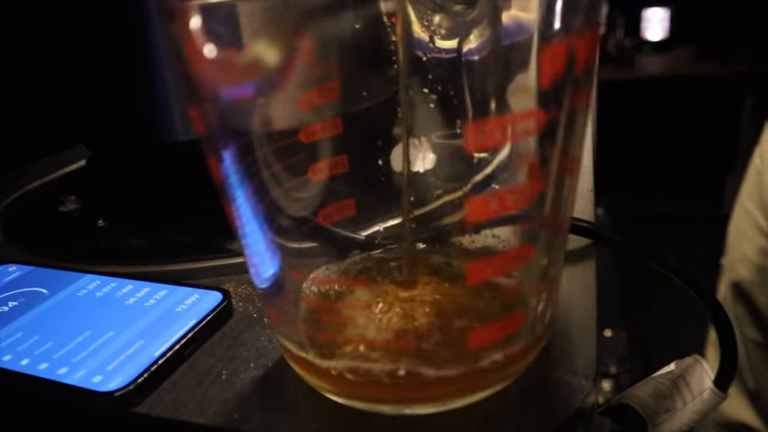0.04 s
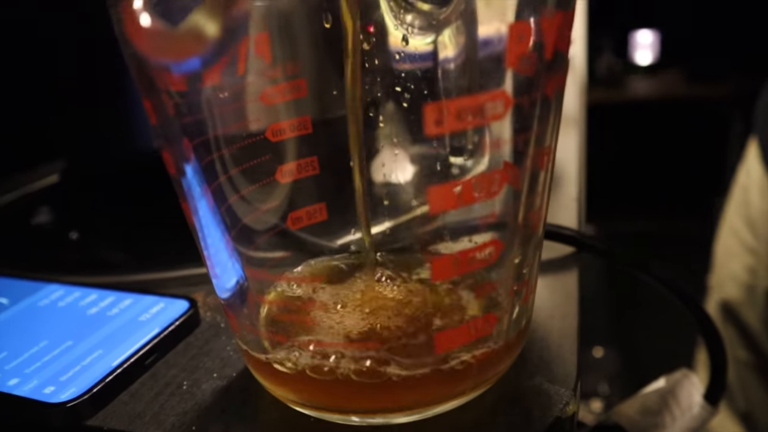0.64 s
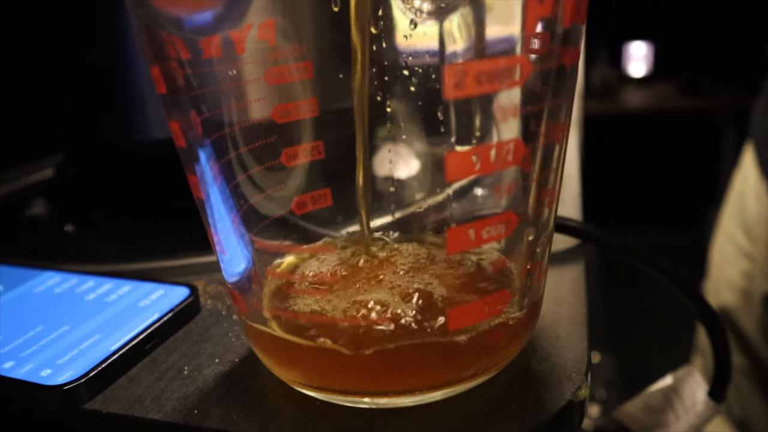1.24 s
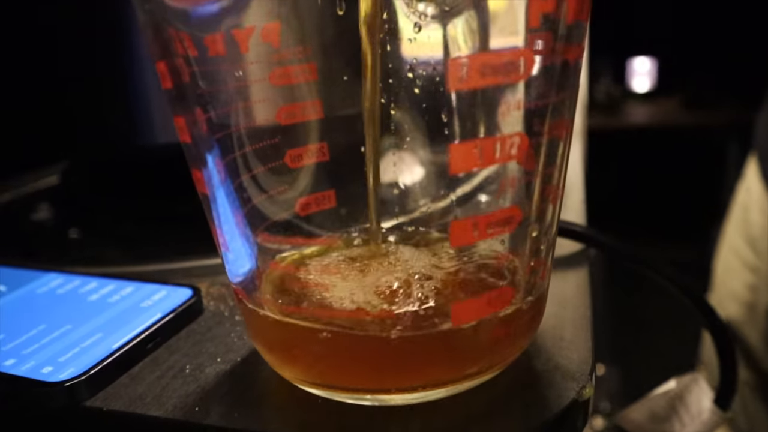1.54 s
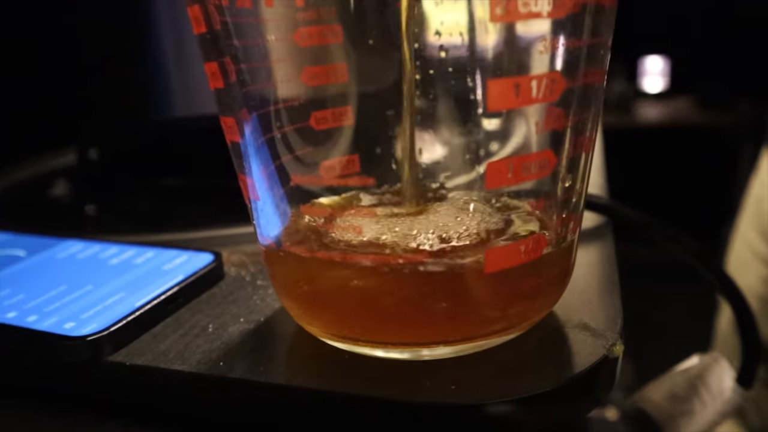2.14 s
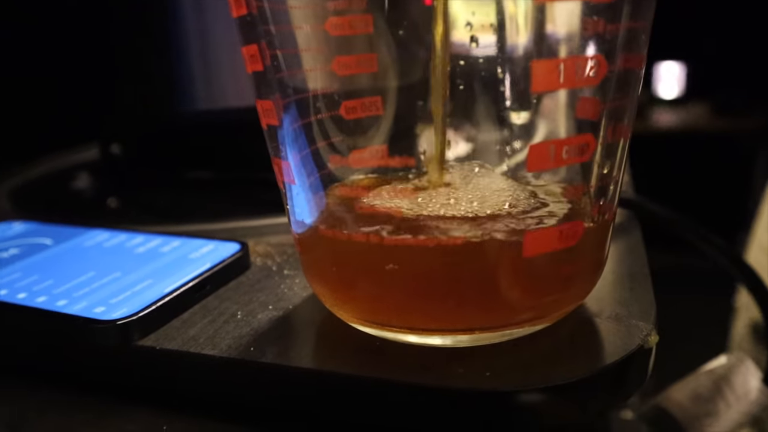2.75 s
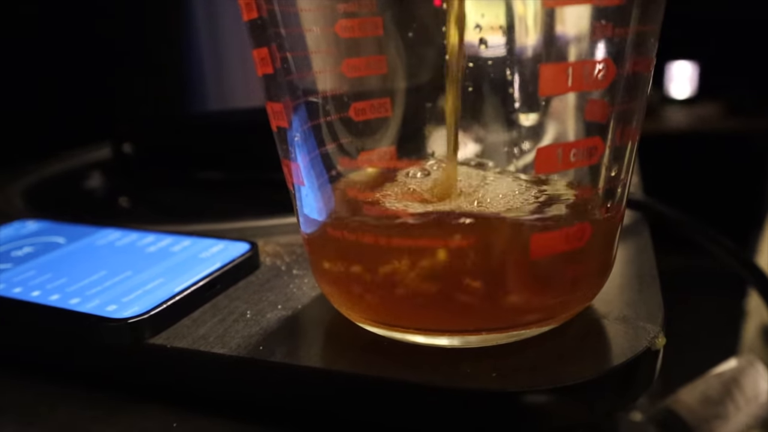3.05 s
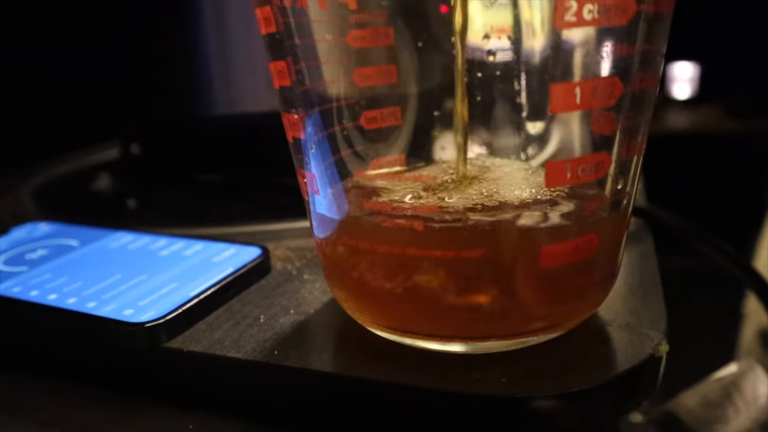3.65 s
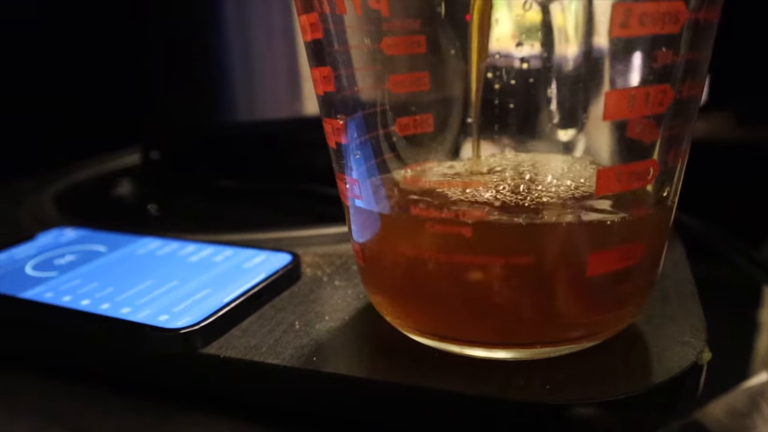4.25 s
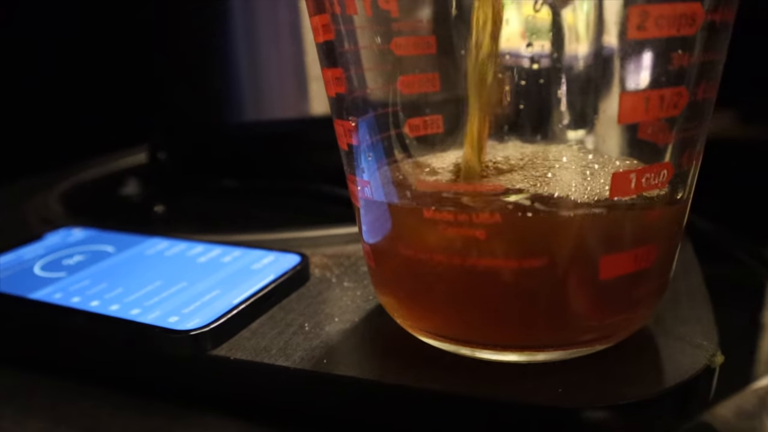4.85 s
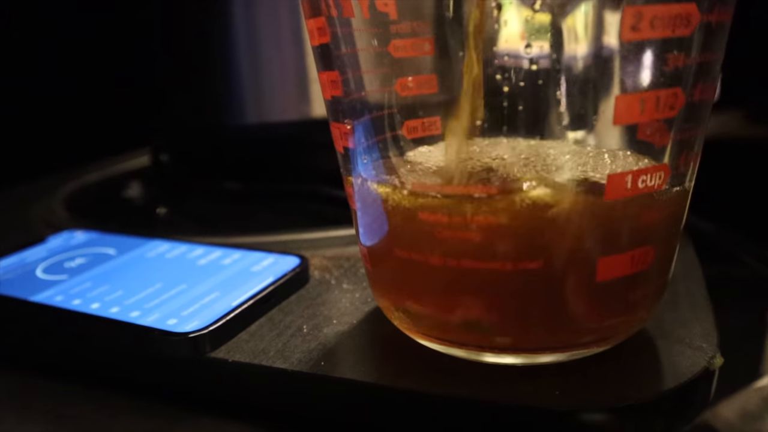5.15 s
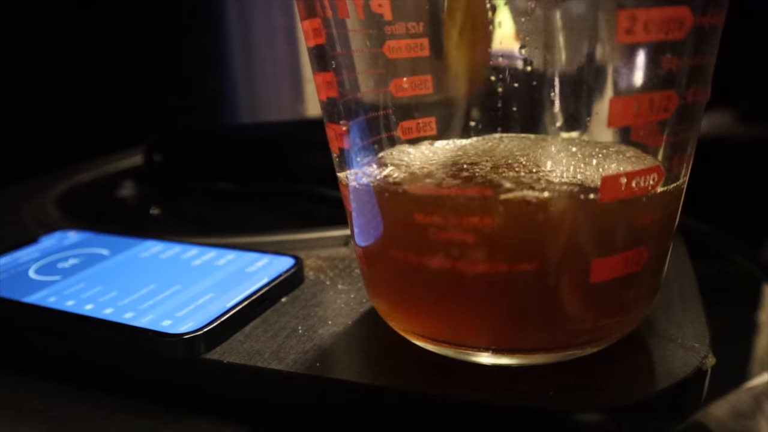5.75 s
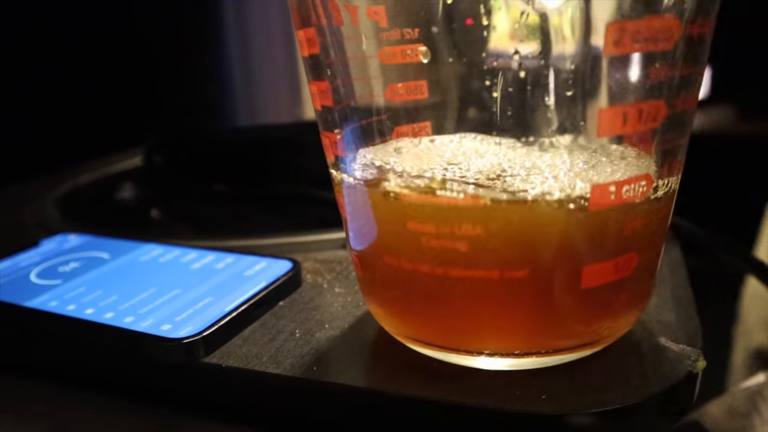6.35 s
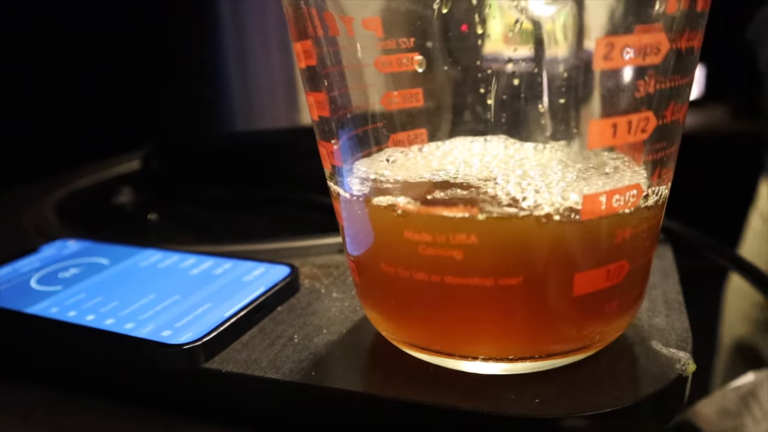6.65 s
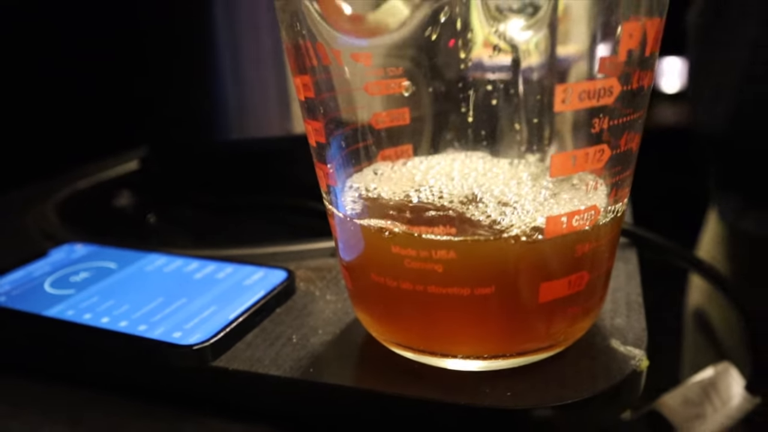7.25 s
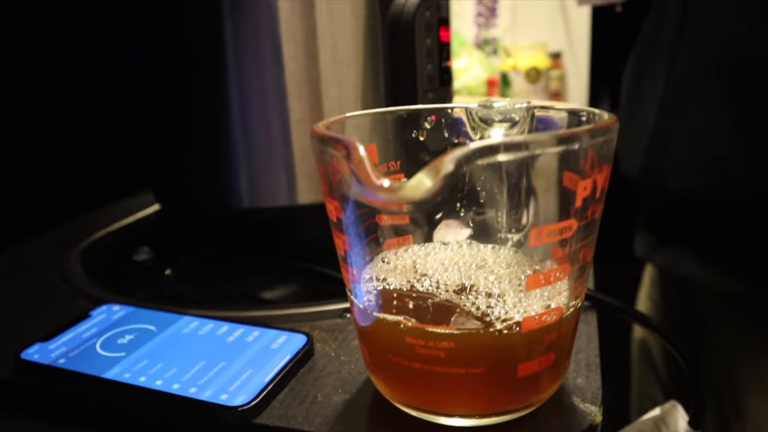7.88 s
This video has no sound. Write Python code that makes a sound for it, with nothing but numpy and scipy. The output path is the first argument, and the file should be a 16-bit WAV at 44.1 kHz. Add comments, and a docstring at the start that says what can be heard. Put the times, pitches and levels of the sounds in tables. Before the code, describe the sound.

Broth pours in uneven glugs into a glass measuring cup, bubbling and spattering, then foam hisses faintly and a few light knocks follow.

```python
"""Broth poured into a glass measuring cup

Close up in a small kitchen, broth comes in glugs over a thin trickle: bubbles ring and rise in pitch, lumps
slap the surface and droplets spatter in the hollow of the cup. A last gulp plops in and sets the glass ringing;
a faint hiss swells, and something is set down with a few knocks."""
import sys
import numpy as np
from scipy import signal
from scipy.fft import rfft, irfft, next_fast_len
from scipy.io import wavfile
from scipy.ndimage import map_coordinates

SR = 44100
rng = np.random.default_rng(int(sys.argv[2]) if len(sys.argv) > 2 else 0)


def master(y):
    """Save y as 16-bit WAV."""
    cut = np.clip(np.atleast_2d(y).T, -1, 1)
    pcm = np.round(cut * 32767)  # scale
    wavfile.write(sys.argv[1], SR, pcm.astype(np.int16))


N = 353593
TOP_HZ = 16400

# Large trapped air pockets. Each row: start in seconds, level in dB, pitch in Hz, t60 in seconds.
AIR_POCKETS = [(.081, -27, 1800, 0.027), (.0985, -33, 1700, 0.014), (.1365, -25.5, 1960, 0.021),
               (.1455, -22, 1170, 0.01), (.1545, -23, 980, 0.015), (.1731, -15.5, 1474, 0.014),
               (.1894, -13, 798, 0.018), (.2488, -19.5, 790, 0.0295), (.2666, -21, 888, 0.02),
               (.388, -26.5, 1610, 0.015), (.529, -33, 1590, .018), (.547, -28, 1500, 0.016),
               (.576, -22, 1510, 0.021), (.6005, -16, 974, 0.0076), (.632, -23, 1280, 0.0094),
               (.697, -30.5, 1320, 0.014), (.8852, -0.9, 878, 0.018), (.919, -23, 935, 0.013),
               (.9689, -27.5, 797, 0.046), (1.1606, -10.5, 1093, 0.0077), (1.1776, -14.5, 1010, 0.012),
               (1.2373, -19, 880, 0.013), (1.423, -22.5, 916, 0.015), (1.44, -22.5, 904, 0.026),
               (1.5024, -21, 984, 0.015), (1.531, -24, 990, .014), (1.5623, -14, 985, 0.017),
               (1.7694, -19, 895, 0.02), (1.8104, -14.5, 987, 0.015), (1.8262, -17.5, 897, 0.015),
               (1.9333, -21, 833, 0.032), (2.1285, -13, 1105, 0.0091), (2.1421, -14, 844, 0.003),
               (2.157, -19.5, 870, 0.023), (2.412, -21.5, 865, 0.068), (2.4615, -15, 1240, 0.01),
               (2.4693, -16.5, 1006, .015), (2.4868, -18.5, 875, 0.039), (2.505, -20, 825, .028),
               (2.5298, -14, 800, 0.032), (2.6106, -14.5, 850, 0.019), (2.6336, -20, 815, 0.031),
               (2.6548, -17.5, 803, 0.039), (2.8302, -8.5, 873, 0.02), (2.8727, -5, 817, 0.024),
               (2.9025, -8.5, 770, 0.018), (3.0927, -10, 709, 0.016), (3.123, -25.5, 327, .022),
               (3.1652, -24, 775, 0.03), (3.389, -18, 809, 0.024), (3.436, -21, 856, 0.02),
               (3.4644, -12.5, 750, 0.01), (3.5726, -19, 563.4, 0.019), (3.6527, -12, 741, 0.0087),
               (3.673, -24, 314, 0.021), (3.8541, -21.5, 821.4, 0.012), (4.1374, -18, 1100, 0.006),
               (4.3209, -17.5, 940, 0.017), (4.9042, -20, 801, 0.015), (4.934, -24.5, 980, 0.016),
               (5.016, -23.5, 1130, 0.016), (5.2032, -19.5, 347, .02), (5.277, -40, 1050, 0.014),
               (5.3146, -21.5, 1010, 0.031), (5.4953, -16.5, 913, 0.023), (5.5172, -16.5, 766, 0.022),
               (5.5921, -18, 929, 0.01), (5.654, -14.5, 976, 0.008), (5.6799, -8.5, 907, 0.026),
               (5.7014, -16, 951, 0.017), (5.9268, -1.5, 895, 0.008), (5.9285, -6.5, 1095, 0.0078),
               (5.9298, -2, 2755, 0.0072)]
# The heaviest lumps of broth landing. Each row: start in seconds, level in dB.
HEAVY_LUMPS = [(3.092, -14), (3.12, -26.5), (3.5725, -11.5), (3.651, -13), (3.941, -24.5), (4.281, -25),
               (4.203, -21.5), (4.358, -24), (4.397, -21.5), (4.419, -16), (4.455, -20.5), (4.678, -18.5),
               (4.724, -18), (4.813, -20.5), (5.156, -21.5), (5.204, -14.5), (5.24, -18), (5.379, -25)]
# The sharpest droplets and foam bursts. Each row: start in seconds, level in dB.
SHARP_DROPLETS = [(0.0808, -19.5), (0.0988, -21), (0.1357, -14.5), (0.1733, -20.5), (0.204, -26),
                  (0.335, -11.5), (0.435, -25.5), (0.579, -22.5), (0.9458, -12.5), (1.563, -21),
                  (2.1413, -16.5), (2.608, -24), (2.447, -15.5), (2.461, -12.5), (3.0753, -19.5),
                  (3.366, -18.5), (3.712, -19), (3.94, -27.5), (4.218, -27), (4.691, -25), (4.842, -27),
                  (5.205, -12), (5.313, -23), (5.4889, -15.5), (5.6267, -19), (5.6534, -18), (5.7546, -24),
                  (5.835, -22.5), (5.8643, -30), (5.9315, -11), (5.953, -26), (6.254, -30.5), (7.037, -25),
                  (7.7708, -30.5)]
# Surges of the pour. Each row: start in seconds, length in seconds, gurgle in dB, spatter in dB.
GLUGS = [(0.134, 0.042, -44, -58), (1.157, 0.069, -50, -82.5), (1.421, 0.12, -41.5, -43),
         (1.701, 0.26, -48, -50), (2.397, 0.14, -41, -45.5), (3.084, 0.045, -36.5, -70),
         (3.349, 0.088, -39, -39.5), (3.571, 0.13, -40, -50.5), (3.852, 0.13, -39.5, -55),
         (4.132, 0.396, -42.5, -61.5), (4.669, 0.081, -44.5, -35), (4.893, 0.18, -43.5, -42.5),
         (5.212, 0.11, -34.5, -40.5), (5.486, 0.23, -41.5, -47)]
# A thicker stream traps larger, lower bubbles. Each row: time in seconds, typical pitch in Hz.
BUBBLE_PITCH = [(.6, 1580), (.9, 882), (1.6, 912), (2.6, 856), (3.2, 686.2), (4.4, 694), (5.6, 1002)]
BASE_PITCH_HZ = BUBBLE_PITCH[1][1]


def amp(db):
    """Decibels to gain."""
    return 10 ** (np.asarray(db) / 20)


def unit(x):
    """Scale to rms 1."""
    return x / np.sqrt(np.mean(x ** 2) + 1e-20)


def along(points, hz):
    """Read a curve of (Hz, value) points on a log frequency axis."""
    point_hz, values = np.transpose(points)
    return np.interp(np.log(hz + 1), np.log(point_hz), values)


def curves(rows):
    """One value per sample for each column after the time."""
    times, *columns = np.transpose(rows)
    return [np.interp(np.arange(N) / SR, times, column) for column in columns]


def wobble(per_s):
    """A smooth random curve with per_s knots a second."""
    knots = rng.standard_normal(int(N * per_s / SR) + 4)
    return map_coordinates(knots, [np.arange(N) * per_s / SR])


def filtered(x, response):
    """Shape x with a complex frequency response."""
    size = next_fast_len(len(x) + 4096)
    return irfft(rfft(x, size) * response(np.fft.rfftfreq(size, 1 / SR)), size)[:len(x)]


def noise(colour):
    """Noise of rms 1, coloured by (Hz, dB) points."""
    return unit(filtered(rng.standard_normal(N), lambda hz: amp(along(colour, hz))))


def add(track, start_s, sound):
    """Mix a sound into the track."""
    part = track[max(round(start_s * SR), 0):][:len(sound)]
    part += sound[:len(part)]


def tight_impulse(colour_db, size=2048):
    """The tightest impulse response that has this colour."""
    cepstrum = irfft(np.log(amp(colour_db(np.fft.rfftfreq(size, 1 / SR)))))
    cepstrum[1:size // 2] *= 2
    cepstrum[size // 2 + 1:] = 0
    return irfft(np.exp(rfft(cepstrum)))


def burst(colour_db, t60, scatter):
    """A coloured transient of peak 1: one push and a dying scatter of smaller ones."""
    t = np.arange(SR // 20) / SR
    pushes = scatter * rng.standard_normal(len(t)) * amp(-60 * t / t60)
    pushes[0] += 1
    sound = signal.fftconvolve(pushes, tight_impulse(colour_db))
    return sound / np.abs(sound).max()


def room_tone():
    """A steady, fan-like rush of air."""
    # Colour of the rush. Each row: frequency in Hz, level in dB.
    air_colour = [(20, -14), (180, -9.5), (350, -4), (530, 0.5), (700, -4.5), (1000, -12), (1300, -12),
                  (1700, -32), (2300, -25), (4000, -29.5), (7000, -35), (12000, -32), (16000, -66)]
    return amp(-51.5) * noise(air_colour)


def handling_rumble():
    """A hand holding the microphone makes a low, lumpy rumble."""
    # Swells of the rumble. Each row: time in seconds, level in dB.
    swells = [(0, -55.5), (.33, -38.5), (.55, -57), (.95, -59), (1.25, -48.5), (2.6, -48.5), (2.9, -62),
              (3.7, -55), (4.2, -44.5), (4.55, -48.5), (4.8, -71), (5.38, -49.5), (6.25, -68.5),
              (6.53, -41.5), (6.75, -56), (7.2, -54.5), (7.5, -77), (7.87, -66), (8.0, -46)]
    # Its colour. Each row: frequency in Hz, level in dB.
    rumble_colour = [(20, -32.5), (40, -5), (70, 1.5), (110, -2), (170, -10), (300, -24), (700, -82)]
    rumble_db, = curves(swells)
    return amp(rumble_db + 2.5 * wobble(22)) * noise(rumble_colour)


def bubble(t, hz, t60, rise, swell=0.13, linger_db=-20):
    """A bubble swells and rings, then lingers faintly, climbing in pitch as it nears the surface."""
    age = t / t60
    envelope = (1 - np.exp(-age / swell)) * (amp(-60 * age) + amp(linger_db - 20 * age))
    glide = rise * (np.hypot(age, .5) - .5) * np.tanh(age / 2)
    phase = hz * t60 * (age + glide)
    return envelope / envelope.max(axis=-1, keepdims=True) * np.sin(2 * np.pi * phase)


def swarm(per_s, hz, spread, cycles, rise, uneven_db):
    """Many bubbles of random size ring around a pitch that may move; rms 1."""
    when, pitch, life, size = rng.random((int(per_s * N / SR), 4)).T
    start = (when * N).astype(int)
    centre_hz = np.broadcast_to(hz, N)[start]
    ring_hz = np.minimum(centre_hz * np.exp(spread * (2 * pitch - 1)), TOP_HZ)[:, None]
    t60 = cycles * (.5 + life[:, None]) / ring_hz
    samples = np.arange(int(min(t60.max(), .03) * SR))
    strength = amp(uneven_db * np.minimum(-np.log(1 - size), 3))[:, None]
    grains = strength * bubble(np.float32(samples / SR), np.float32(ring_hz), np.float32(t60), rise)
    return unit(np.bincount((start[:, None] + samples).ravel(), grains.ravel(), N)[:N])


def hollow(x, direct):
    """Part of the sound leaves directly, part rings the air in the cup."""
    # Resonances of that air. Each row: centre in Hz, width in Hz, gain in dB.
    air_modes = [(915, 120, -0.5), (1533, 454, 7), (2280, 257, 4), (3060, 415, 2)]
    return filtered(x, lambda hz: direct + sum(
        amp(db) * 1j * hz * width / (centre ** 2 - hz ** 2 + 1j * hz * width)
        for centre, width, db in air_modes))


def surge(t, attack_s=0.0038, release_s=0.018):
    """Gurgle and spatter gains of the glugs: each one swells, holds and dies away."""
    gains = np.zeros((2, N))
    for start, length, *levels_db in GLUGS:
        corners_s = [0, attack_s, length, length + release_s, length + 3 * release_s]
        gains += amp(levels_db)[:, None] * np.interp(t - start, corners_s, [0, .7, .47, .06, 0])
    return gains


def stirring(t, boost_db=10, settle_s=0.0045):
    """Extra churn in dB: a flurry just after each big impact."""
    impacts = np.sort([-1] + [row[0] for row in [*AIR_POCKETS, *HEAVY_LUMPS, *SHARP_DROPLETS]])
    since_impact = t - impacts[np.searchsorted(impacts, t, "right") - 1]
    return boost_db * np.exp(-since_impact / settle_s)


def stream(end_s=5.98, dribble_db=4):
    """The stream breaks into clumps and churns up bubbles, while fresh foam pings and ticks."""
    # The thin flow between glugs. Each row: time in seconds, small bubbles in dB, gurgle in dB.
    thin_flow = [(0, -54.5, -57.5), (.8, -57, -53.5), (.96, -53.5, -52), (1.02, -43.5, -44.5),
                 (1.33, -46.5, -38.5), (1.45, -53, -56), (1.64, -48, -45.5), (1.85, -49.5, -40),
                 (2.05, -50, -48), (2.3, -54, -40), (2.56, -56.5, -45), (2.75, -53, -39.5),
                 (3.25, -56, -42.5), (3.55, -51.5, -51), (4.05, -56, -47.5), (4.6, -61.5, -56.5),
                 (4.8, -49.5, -47.5), (5.1, -57, -55), (5.35, -50, -46), (5.75, -63, -80)]
    trickle_db, trickle_gurgle_db = curves(thin_flow)
    pitch_hz, = curves(BUBBLE_PITCH)
    t, clumps = np.arange(N) / SR, wobble(55)
    glug_gurgle, glug_spatter = surge(t)
    weakness = np.interp(trickle_db, [-54, -44], [1, 0])  # a weak trickle breaks into separate drops
    trickle_db = trickle_db + dribble_db * weakness * (clumps - .5)
    gurgle_db = 20 * np.log10(glug_gurgle + amp(trickle_gurgle_db))
    spatter_db = 20 * np.log10(glug_spatter + amp(trickle_db - 4))
    splash_db = (gurgle_db + spatter_db) / 2
    small_hz = 3050 * np.minimum(pitch_hz / BASE_PITCH_HZ, 1) ** 0.5  # lower in a thicker stream
    middling = swarm(per_s=210, hz=pitch_hz, spread=.22, cycles=17, rise=.1, uneven_db=5)
    splats = swarm(per_s=300, hz=1600, spread=1.1, cycles=6, rise=.1, uneven_db=9)
    small = swarm(per_s=500, hz=small_hz, spread=.36, cycles=16, rise=.15, uneven_db=6)
    tiny = swarm(per_s=700, hz=5800, spread=.45, cycles=20, rise=.1, uneven_db=7)
    pings = swarm(per_s=300, hz=10500, spread=.4, cycles=22, rise=.1, uneven_db=9)
    ticks = swarm(per_s=90, hz=10000, spread=.45, cycles=5, rise=0, uneven_db=10)
    gurgle = amp(gurgle_db - 1) * middling + amp(splash_db - 2.5) * splats
    trickle = (amp(trickle_db + 0.5) + amp(splash_db - 12.5)) * small
    sparkle = amp(splash_db - 16) * tiny + amp(spatter_db - 14) * pings
    fizz = amp(3 * clumps) * sparkle + amp(splash_db - 6) * ticks
    churn = amp(2.2 * clumps + stirring(t) - 2.5) * (t < end_s)
    return churn * (hollow(gurgle + trickle, direct=0.44) + fizz)


def falling(per_s, most=14):
    """Loosely spaced impacts within each glug: start in seconds, gurgle in dB, spatter in dB."""
    impacts = []
    for start, length, gurgle_db, spatter_db in GLUGS:
        times = start + (np.arange(most) + rng.random(most)) / per_s
        impacts += [(time, gurgle_db, spatter_db) for time in times if time < start + length]
    return impacts


def spray(over_spatter_db=11.5, soft_tick_db=-5):
    """Each droplet ticks and leaves a cluster of tiny ringing bubbles; lesser ones land softly."""
    out, t = np.zeros(N), np.arange(SR // 80) / SR
    tick_colour = [(200, -33), (2000, 9), (8000, -0.5), (15000, 1.5)]
    sharp = [(start, db, 0) for start, db in SHARP_DROPLETS]
    lesser = [(start, db + over_spatter_db, soft_tick_db) for start, _, db in falling(per_s=43)]
    for start, db, tick_db in sharp + lesser:
        for delay, pitch, faintness in rng.random((5, 3)):
            hz = 7400 * np.exp(.6 * (2 * pitch - 1))
            ping = bubble(t, hz, t60=34 / hz, rise=.1)
            add(out, start + .008 * delay ** 2, amp(db - 10 - 12 * faintness) * ping)
        # the tick is tinted by the pitch of one of its bubbles
        tinted = lambda f: along(tick_colour, f) + 9 * np.exp(-(4 * (f / hz - 1)) ** 2)
        add(out, start, amp(db + tick_db + 2) * burst(tinted, t60=.018, scatter=.16))
    return hollow(out, direct=1.0)


def typical_hz(time_s):
    """The pitch of the bubbles that the stream traps at this moment."""
    return np.interp(time_s, *np.transpose(BUBBLE_PITCH))


def plops():
    """Each large bubble is set off by a snap as its neck closes; shallow ones snap harder."""
    out, t = np.zeros(N), np.arange(SR // 8) / SR
    snap_colour = [(60, -111), (1200, 2), (2600, -7), (5000, -15.5), (15000, -26)]
    for (start, db, hz, t60), chance in zip(AIR_POCKETS, rng.random(len(AIR_POCKETS))):
        # small bubbles from a thin stream lie shallow and glide most; large deep ones hold their pitch
        rise = (.7 + .6 * chance) * np.interp((hz + typical_hz(start)) / 2, [850, 1150], [.03, .65])
        ring = bubble(t, hz, t60, rise, linger_db=np.interp(rise, [0, .3], [-21, -14]))
        snap = burst(lambda f: along(snap_colour, f), t60=.028, scatter=.21)
        add(out, start, amp(db - 2.5) * ring)
        add(out, start, amp(db - 17 + 10 * rise) * snap)
    return out


def slaps(over_gurgle_db=12.5, db_per_octave=11.5, plink_delay_s=0.00321):
    """Thick lumps hit the surface with a dull splat and push a small bubble under."""
    # Colour of the splat. Each row: frequency in Hz, level in dB.
    splat_colour = [(40, -36), (150, -20), (300, -1), (520, 2), (850, 4.5), (1500, -5.5), (2400, -19.5),
                    (4000, -19.5), (16000, -35.5)]
    out, t = np.zeros(N), np.arange(SR // 16) / SR
    lumps = list(HEAVY_LUMPS)
    for start, gurgle_db, _ in falling(per_s=32):  # lesser lumps grow as the bubbles get lower
        octaves_down = np.log2(BASE_PITCH_HZ / typical_hz(start))
        lumps.append((start, gurgle_db + over_gurgle_db + db_per_octave * octaves_down))
    for start, db in lumps:
        splat = burst(lambda f: along(splat_colour, f), t60=0.029, scatter=0.15)
        plink = bubble(t, hz=1705 * np.exp(rng.random() - .5), t60=0.023, rise=0.137)
        add(out, start, amp(db) * splat)
        add(out, start + plink_delay_s, amp(db - 17) * plink)
    return out


def tinkles(ring_cycles=28.7):
    """Each droplet ticks on the surface and traps one small bubble, which chirps upward."""
    # Droplets falling back in. Each row: start in seconds, level in dB, pitch in Hz.
    droplets = [(0.138, -17, 2960), (0.176, -15.5, 2420), (0.228, -22, 3320), (0.784, -30.5, 3460),
                (0.949, -22, 5040), (1.0148, -22, 3000), (1.024, -25, 4230), (1.27, -23, 3180),
                (1.3315, -20, 2740), (1.3874, -19.5, 2880), (1.702, -22.5, 3020), (1.8825, -19, 3050),
                (1.914, -20.5, 3280), (2.128, -23.5, 3000), (2.409, -18.5, 4400), (2.5289, -16.5, 2280),
                (2.6103, -18, 2350), (2.8732, -24, 2390), (2.954, -30, 3170), (3.3444, -25.5, 2247),
                (3.6496, -18.5, 1770), (3.9361, -23, 3380), (4.1432, -24.5, 3200), (4.2523, -25.5, 2193),
                (4.3584, -21, 2935), (4.6789, -21.5, 5115), (4.6794, -18.5, 2276), (4.7685, -22.5, 2680),
                (4.843, -17.5, 3020), (4.905, -24, 5850), (5.234, -21.5, 3700), (5.3135, -19, 2300)]
    out, t = np.zeros(N), np.arange(SR // 20) / SR
    for (start, db, hz), chance in zip(droplets, rng.random(len(droplets))):
        chirp = bubble(t, hz, t60=ring_cycles / hz, rise=0.214 * (.5 + chance))
        tick = burst(lambda f: -9 * np.abs(np.log2((f + 20) / hz)), t60=0.025, scatter=0.15)
        add(out, start, amp(db - 2) * chirp)
        add(out, start, amp(db - 9.5) * tick)
    return out


def glass(liquid):
    """The cup wall rings faintly with whatever happens in the liquid."""
    # Modes of the wall. Each row: pitch in Hz, level in dB, t60 in seconds.
    wall_modes = [(1275, 0, 0.25), (1336, 10.5, 0.065), (3220, 10, 0.15), (3820, 4, 0.25)]
    t = np.arange(SR // 3) / SR
    ring = sum(amp(db - 60 * t / t60) * np.sin(2 * np.pi * hz * t) for hz, db, t60 in wall_modes)
    return amp(-64) * signal.fftconvolve(liquid, ring)[:N]


def faint_hiss():
    """A faint hiss swells after the pour."""
    # Swell of the hiss. Each row: time in seconds, level in dB.
    swell = [(6.0, -61.5), (6.9, -58.5), (7.35, -55.5), (7.6, -59.5), (8.0, -57)]
    hiss_db, = curves(swell)
    hiss_colour = [(500, -7), (2200, 6.5), (4500, 0.5), (7500, -7), (15000, -6)]
    return amp(hiss_db + 2.84 * wobble(150)) * noise(hiss_colour)


def knocks(body_hz=571, body_t60_s=.04):
    """Each contact cracks, rings a hard shell and thumps a hollow body; harder ones are brighter."""
    # Things knocked and set down nearby. Each row: start in seconds, level in dB,
    # body in dB over that level, hardness as treble tilt in dB per octave.
    contacts = [(6.859, -28.5, -3, -2), (6.884, -30.5, -6, -6), (7.032, -29.5, -6, 2.5),
                (7.4557, -16.5, 3.5, 6.5), (7.461, -15, 2, 0.5), (7.467, -32, -14, -7), (7.476, -29, 1, 0),
                (7.501, -23, -18, -6), (7.895, -30, -8, -6.5), (7.92, -29, 0, -1), (7.928, -19.5, -1, 3)]
    # Modes of the shell, lowest first. Each row: pitch in Hz, level in dB, t60 in seconds.
    shell_modes = [(1160, 0, .035), (1290, -5, .04), (1733, -10, .03), (2735, -8, .035), (3350, -6, .028),
                   (3930, -5, .028), (4400, -6, .028)]
    # Colour of the crack. Each row: frequency in Hz, level in dB.
    crack_colour = [(200, -21), (800, 4), (1200, 2.5), (1900, -8), (3600, -3), (5600, -7), (7500, -26),
                    (15000, -37)]
    out, t = np.zeros(N), np.arange(SR // 8) / SR
    for start, db, body_db, hardness in contacts:
        tilt_db = lambda hz: hardness * np.log2(np.maximum(hz / shell_modes[0][0], 1))
        shell = np.zeros(len(t))
        for hz, mode_db, t60 in shell_modes:
            strike = (.5 + rng.random()) * rng.choice([-1, 1])
            shell += strike * amp(mode_db + tilt_db(hz) - 60 * t / t60) * np.sin(2 * np.pi * hz * t)
        body = amp(body_db - 60 * t / body_t60_s) * np.sin(2 * np.pi * body_hz * t)
        crack = burst(lambda f: along(crack_colour, f) + tilt_db(f), t60=.035, scatter=.4)
        add(out, start, amp(db) * (amp(-8.5) * shell + body))
        add(out, start, amp(db - 2) * crack)
    low_cut = signal.butter(2, 220, "highpass", fs=SR, output="sos")  # the knocks carry no deep bass
    return signal.sosfilt(low_cut, out)


def kitchen(x):
    """A short tail from the counter and walls, dying fastest in the treble."""
    # Decay of the room. Each row: frequency in Hz, t60 in seconds.
    decay_times = [(200, 0.28), (1000, 0.074), (4000, 0.037), (14000, 0.0039)]
    hz, t, spectrum = signal.stft(rng.standard_normal(SR // 3), SR, nperseg=256)
    decay = amp(-60 * t / along(decay_times, hz)[:, None])
    _, tail = signal.istft(spectrum * decay, SR, nperseg=256)
    delayed_tail = np.pad(tail / np.linalg.norm(tail), (SR // 250, 0))
    return signal.fftconvolve(x, delayed_tail)[:N]


def scene():
    """Liquid, cup and knocks in the kitchen, over a bed of room tone and rumble."""
    liquid = plops() + slaps() + tinkles() + spray() + stream() + faint_hiss()
    near = liquid + glass(liquid) + knocks()
    return (near + amp(-18) * kitchen(near) + room_tone() + handling_rumble())[None]


def record(dry, threshold_db=-3, recover_db_per_s=4, smooth_s=.025):
    """Gain control ducks just after an overload and creeps back; peaks clip; the top is rolled off."""
    x, t = dry[0], np.arange(N) / SR
    over_db = np.maximum(20 * np.log10(np.abs(x) + 1e-9) - threshold_db, 0)
    held_db = np.maximum.accumulate(over_db + recover_db_per_s * t) - recover_db_per_s * t
    pole = np.exp(-1 / (smooth_s * SR))
    duck_db = signal.lfilter([1 - pole], [1, -pole], held_db)
    clipped = np.clip(x * amp(-duck_db), -1, 1)
    return filtered(clipped, lambda hz: np.clip((TOP_HZ - hz) / 900, 0, 1))[None]


dry = scene()
out = record(dry)
master(out)
```